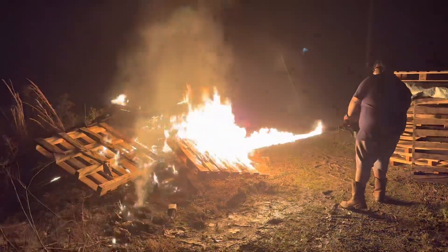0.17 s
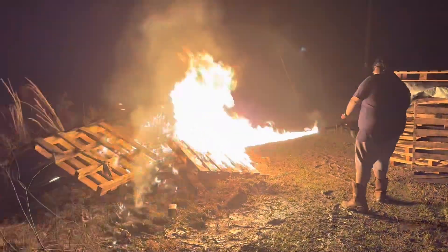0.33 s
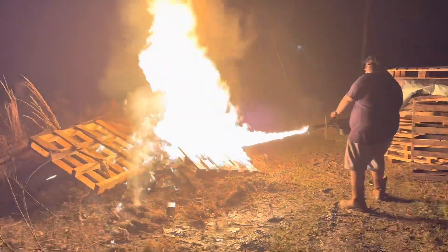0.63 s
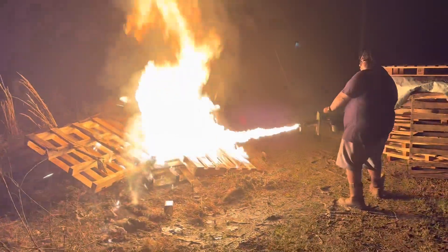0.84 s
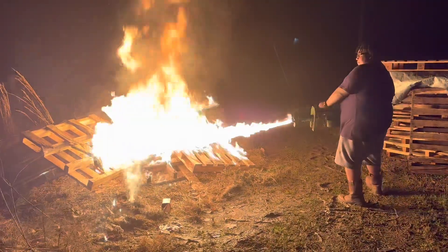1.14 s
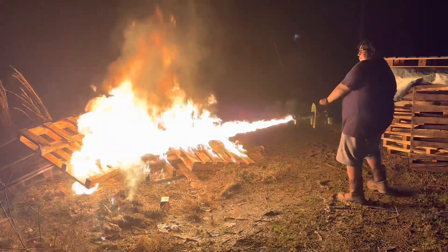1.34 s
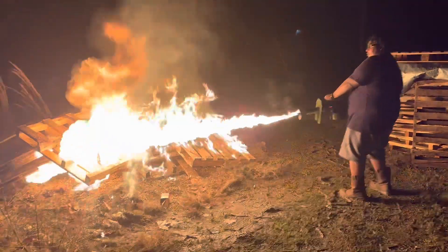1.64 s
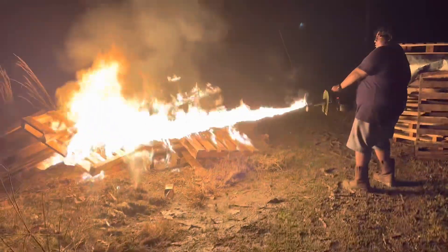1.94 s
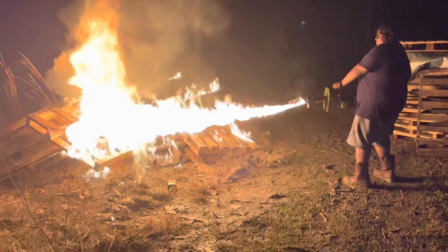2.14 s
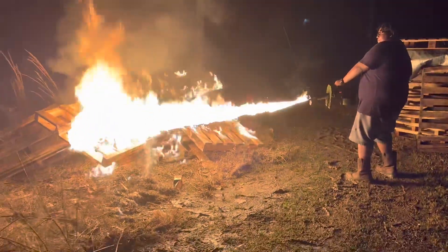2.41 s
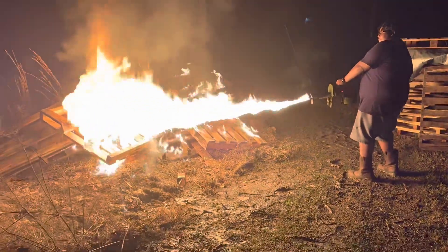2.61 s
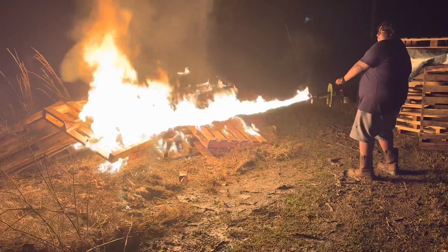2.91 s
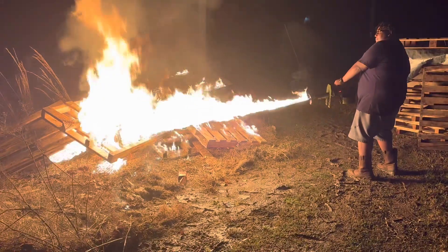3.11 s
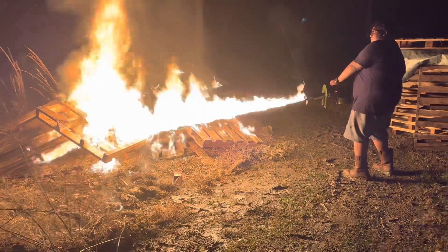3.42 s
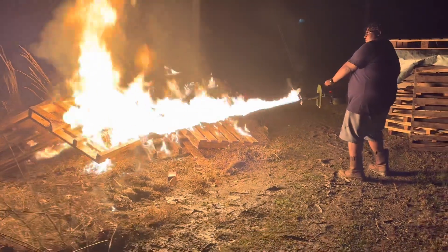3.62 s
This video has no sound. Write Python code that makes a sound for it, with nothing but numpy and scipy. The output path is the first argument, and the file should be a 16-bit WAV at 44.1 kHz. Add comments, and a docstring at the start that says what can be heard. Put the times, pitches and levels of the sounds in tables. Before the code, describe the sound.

A gas torch flame and burning wooden pallets roar steadily outdoors, a few metres away. The nozzle hisses and spits quick runs of sharp ticks, steam briefly fizzes from the wood, and one pop sounds near the end.

```python
"""Outdoors at night, a few metres from burning pallets, on a small two-port microphone.
A flame jet sweeps over the wood, and the turbulent fire rumbles and roars to the left.
On the right, gas hisses from the nozzle and spits in quick runs of ticks.
Three pockets of steam fizz out of the wood, and near the end something pops."""
import sys
import numpy as np
from scipy import signal
from scipy.fft import rfft, irfft, next_fast_len
from scipy.io import wavfile
from scipy.ndimage import uniform_filter1d

SR = 44100
rng = np.random.default_rng(int(sys.argv[2]) if len(sys.argv) > 2 else 0)


def persist_wave(psi):
    """Save psi, clipped to +-1, as 16-bit WAV."""
    counts = np.round(np.clip(psi, -1, 1) * 32767).astype(np.int16)
    wavfile.write(sys.argv[1], SR, np.atleast_2d(counts).T)


N = 165816
T = np.arange(N) / SR

# Swell of the fire's four bands: t/s, rumble/dB, low roar/dB, roar/dB, sizzle/dB
FIRE_LEVELS = [(0.0, -31, -41, -41, -55), (0.08, -32.5, -42.0, -42, -55),
               (0.18, -31.5, -41.5, -37.5, -48.0), (0.3, -31, -41, -35, -48),
               (0.42, -29, -36.5, -36.5, -43.5), (0.6, -27, -37.0, -36, -47.5),
               (0.78, -26.5, -36, -36.5, -46.5), (0.92, -25, -36, -35, -46), (1.05, -28, -36, -37.5, -46.5),
               (1.2, -28.5, -36.5, -38.5, -48.0), (1.4, -28.0, -36, -37.5, -48.5),
               (1.57, -29, -37, -38, -48.5), (1.72, -29, -32.5, -36.5, -48.0), (1.85, -30, -37, -37.0, -49),
               (2.02, -25.5, -35, -37.5, -45.5), (2.15, -29, -34.5, -37.5, -48.5),
               (2.35, -29.5, -36, -37.5, -49.5), (2.55, -27.5, -34.5, -36.5, -47.5),
               (2.8, -27.5, -36, -38.0, -48.5), (3.0, -27, -37, -37, -50.5),
               (3.18, -27.5, -35.5, -38, -47.5), (3.4, -26, -33.5, -37, -47.5),
               (3.6, -25.0, -36.0, -37, -47.5), (3.76, -27.5, -34.5, -38.5, -49.5)]
# Each band at the microphone: f/Hz, relative level/dB, left over right/dB, likeness/0-1, left lead/rad
RUMBLE_BAND = [(15, -44, 0, 1, 0), (25, -30, 0, 1, 0), (40, -11, -.1, 1, .01), (54, -2, -.1, 1, .01),
               (95, 0, -.2, 1, .03), (125, -3, -.3, .995, .05), (170, -4, -.5, .99, .1),
               (215, -7, -.4, .98, .16), (300, -10, .3, .95, .2), (380, -15.5, .5, .87, .15),
               (520, -35, .4, .9, .2)]
LOW_ROAR_BAND = [(300, -25, .3, .95, .2), (400, -6, .5, .86, .13), (520, -2, .4, .9, .21),
                 (650, -1, 1.6, .92, .27), (780, -1, 2.3, .9, .38), (870, -4.5, 4, .88, .46),
                 (1000, -25, 3, .85, .3)]
ROAR_BAND = [(740, -25, 2.3, .9, .35), (870, -4.5, 4, .88, .46), (950, -2.5, 3.5, .86, .36),
             (1050, -4, 2.8, .84, .26), (1200, -7, 2.6, .4, .9), (1380, -8, 2.5, .15, 1),
             (1550, -9.5, -1.5, .33, 2.3), (1720, -12, -.5, .7, .5), (1900, -11, .1, .93, .08),
             (2200, -13, .2, .82, .3), (2950, -15.5, .6, .67, 1.47), (3300, -16, 2.8, .6, 1.28),
             (3750, -20, 2, .66, .75), (4500, -38, 4, .35, .3)]
SIZZLE_BAND = [(2800, -20, .5, .67, 1.4), (3950, -2, 1.3, .65, .68), (4350, -1, 4, .33, .5),
               (4750, -1, 4.2, .45, -.45), (5300, -1.5, 1.3, .66, 0), (6000, 0, .1, .7, .53),
               (6500, -.5, .7, .49, .9), (6900, -1, 1.9, .43, 1.25), (7400, -2, 2.8, .55, 2.5),
               (7700, -3, 3.5, .3, 3.2), (8100, -5, 1.5, .7, 5.9), (9500, -20, 0, .7, 5)]
# Swell of the gas hiss: t/s, level/dB
HISS_LEVELS = [(0.0, -43), (0.05, -49), (0.12, -38.5), (0.19, -38), (0.24, -42), (0.31, -40.0),
               (0.37, -36.5), (0.45, -39), (0.55, -39.0), (0.64, -38), (0.7, -43), (0.77, -42), (0.81, -41),
               (0.86, -37.5), (0.93, -42), (1.0, -40.5), (1.06, -44), (1.16, -46), (1.27, -47.0),
               (1.36, -44), (1.45, -43), (1.56, -40.5), (1.6, -43), (1.66, -40.5), (1.8, -41.5), (1.9, -36),
               (1.98, -39), (2.05, -45), (2.17, -46), (2.23, -47), (2.32, -44), (2.43, -42), (2.55, -41),
               (2.68, -42.0), (2.8, -41), (2.91, -38), (3.0, -43.5), (3.15, -40), (3.3, -40.5),
               (3.4, -44.0), (3.48, -38.5), (3.55, -40.5), (3.65, -41.0), (3.72, -45.5), (3.76, -39)]
# Colour of the gas hiss: f/Hz, relative level/dB
HISS_COLOUR = [(4500, -19), (7000, -15.5), (8400, -2), (9300, -1.5), (10300, 3), (11200, -10), (12500, 4),
               (13400, 0.5), (14300, 2), (15720, 1)]
# The hiss across the two ports: f/Hz, likeness/0-1, left lead/rad
HISS_IMAGE = [(7400, .7, 2.5), (8000, .85, -.4), (8400, .92, -.14), (9300, .7, -1.05), (10300, .85, -2.7),
              (10700, .97, -3.05), (11000, .998, -3.13), (11500, .998, -3.15), (11750, .96, -3.25),
              (12500, .68, -4.3), (13400, .77, -5.6), (13850, .95, -6.15), (14100, .99, -6.26),
              (14900, .99, -6.31), (15200, .9, -6.5), (15600, .75, -6.9)]
# Loud single spits from the nozzle: t/s, peak/dB
LOUD_SPITS = [(0.0606, -24.0), (0.0701, -21.0), (0.0977, -22.0), (0.1654, -19.0), (0.1702, -19.0),
              (0.1756, -19.0), (0.1828, -18.0), (0.189, -18.0), (0.2023, -20.0), (0.2627, -19.0),
              (0.2712, -25.0), (0.3371, -19.0), (0.345, -20.0), (0.3628, -14.0), (0.3683, -19.0),
              (0.3835, -17.0), (0.3918, -16.0), (0.6062, -19.0), (0.6195, -18.0), (0.6525, -18.0),
              (0.6854, -19.0), (0.7073, -16.0), (0.7152, -17.0), (0.7385, -19.0), (0.7451, -20.0),
              (0.7716, -16.0), (0.7778, -15.0), (0.7848, -17.0), (0.8193, -18.0), (0.8498, -14.0),
              (0.8561, -16.0), (0.863, -18.0), (1.0049, -19.0), (1.1316, -22.0), (1.2276, -23.0),
              (1.6893, -23.0), (1.8768, -18.0), (1.8837, -18.0), (1.8925, -16.0), (1.8967, -19.0),
              (1.9, -15.0), (1.9042, -16.0), (1.917, -21.0), (1.9269, -16.0), (1.9322, -20.0),
              (2.0875, -20.0), (2.1166, -17.0), (2.1267, -22.0), (2.1802, -16.0), (2.2531, -22.0),
              (2.2618, -24.0), (2.3611, -16.0), (3.4693, -16.0), (3.4742, -17.0), (3.479, -20.0)]
# Pockets of steam: t/s, level/dB, fall/s, centre/Hz, width/Hz
STEAM_JETS = [(.812, -33, .025, 5500, 4000), (1.108, -41.5, .004, 5800, 1200),
              (1.553, -44, .005, 3400, 1500)]
# The pop, left port then right: snap t/s, snap level/dB, snap f/Hz, snap rise/s, thud t/s, thud level/dB
POP_AT_PORTS = [(3.29, -7, 1300, .00015, 3.2914, -7), (3.2896, -4.5, 1560, .0004, 3.2906, -4.5)]


def fire(flutter_db=.7, flutter_hz=9):
    """Turbulent burning: four bands of noise, each on its own swell and fluttering a little."""
    out = 0
    for column, colour in enumerate([RUMBLE_BAND, LOW_ROAR_BAND, ROAR_BAND, SIZZLE_BAND], start=1):
        band = noise_at_ports(colour)
        level_db = curve(FIRE_LEVELS, column) + flutter_db * drift(flutter_hz)
        out = out + band / np.std(band.mean(axis=0)) * undb(level_db)
    return out


def nozzle_hiss(spits_per_s=900, spread_db=4.5, cap_db=14, smooth_share=.55, sputter_db=1, sputter_hz=30):
    """Gas leaves the nozzle as a smooth hiss, roughened by dense small spits with tiny tails."""
    onsets = rng.random(N) < spits_per_s / SR
    sizes = undb(np.minimum(spread_db * rng.exponential(size=N), cap_db))
    small_spits = unit(decay(onsets * sizes, fall_s=.00057))
    envelope = np.sqrt(smooth_share + (1 - smooth_share) * small_spits ** 2)
    hz = np.unique([row[0] for row in [*HISS_COLOUR, *HISS_IMAGE]])
    (colour_db,) = at_frequencies(HISS_COLOUR, hz)
    likeness, lead = at_frequencies(HISS_IMAGE, hz)
    band = np.column_stack([hz, colour_db, np.zeros_like(hz), likeness, lead])
    hiss = unit(noise_at_ports(band, envelope))
    return hiss * undb(curve(HISS_LEVELS, 1) + sputter_db * drift(sputter_hz))


def nozzle_spits(ground_s=.00165, ground_db=-7, left_lag_s=.00014):
    """Sharp clicks with a scattered trail, heard again off the ground; the left port gets them later."""
    clicks = np.zeros(N)
    for start_s, db in LOUD_SPITS:
        clicks[int(start_s * SR)] = undb(db)
    clicks = clicks + undb(ground_db) * np.roll(clicks, int(ground_s * SR))
    trail = undb(-23) * decay(clicks, fall_s=.0015)
    shared, *separate = trail * rng.standard_normal((3, N))
    left, right = clicks + shared + undb(-8) * np.array(separate)
    left = np.roll(left, round(left_lag_s * SR))
    highpass = signal.butter(2, 8500, "high", fs=SR, output="sos")
    lowpass = signal.cheby2(8, 35, 16200, fs=SR, output="sos")
    treble = np.vstack([highpass, lowpass])
    click_peak = np.abs(signal.sosfilt(treble, T == 0)).max()
    return signal.sosfilt(treble, [left, right]) / click_peak


def steam(rise_share=.35, rough_db=2.5, rough_hz=300):
    """Steam escapes from the wood in short, rough jets."""
    out = 0
    for start_s, db, fall_s, centre_hz, width_hz in STEAM_JETS:
        age = np.maximum(T - start_s, 0) / fall_s
        envelope = 2 * (1 - np.exp(-(age / rise_share) ** 2)) * np.exp(-age)  # peaks near 1
        edges_hz = [centre_hz - width_hz / 2, centre_hz + width_hz / 2]
        bandpass = signal.butter(2, edges_hz, "band", fs=SR, output="sos")
        fizz = unit(signal.sosfilt(bandpass, noise_at_ports(SIZZLE_BAND)))
        out = out + undb(db + rough_db * drift(rough_hz)) * fizz * envelope
    return out


def pop(snap_fall_s=.0006, start_hz=830, end_hz=195, glide_s=.0015, hold_s=.0025, thud_fall_s=.0015):
    """A snap with a bright edge and a woody ring, then a thud diving in pitch; right port first."""
    out = []
    for snap_s, snap_db, snap_hz, rise_s, thud_s, thud_db in POP_AT_PORTS:
        t = T - snap_s
        snap = np.exp(-np.abs(t) / np.where(t < 0, rise_s, snap_fall_s)) * np.cos(2 * np.pi * snap_hz * t)
        edge = ring(snap_s, db=-23, hz=4900, fall_s=.00025)
        wood = ring(snap_s, db=-13, hz=2350, fall_s=.0008)
        age = np.maximum(T - thud_s, 0)
        cycles = end_hz * age + (start_hz - end_hz) * glide_s * (1 - np.exp(-age / glide_s))
        thud = np.exp(-np.maximum(age - hold_s, 0) / thud_fall_s) * np.sin(2 * np.pi * cycles)
        out.append(undb(snap_db) * snap + edge + wood + undb(thud_db) * thud)
    return np.array(out)


def ring(start_s, db, hz, fall_s):
    """One struck resonance dying away."""
    age = np.maximum(T - start_s, 0)
    return undb(db) * np.exp(-age / fall_s) * np.sin(2 * np.pi * hz * age)


def noise_at_ports(band, envelope=1):
    """Coloured noise at the microphone: a shared part with a phase lead, plus each port's own part."""
    size = next_fast_len(N + SR // 10)
    hz = np.arange(size // 2 + 1) * SR / size + 1  # 1 Hz up keeps the log finite
    db, balance_db, likeness, lead = at_frequencies(band, hz)
    side = np.array([[.5], [-.5]])  # left, right
    direct = rfft(envelope * rng.standard_normal(N), size) * np.exp(1j * side * lead)
    diffuse = rfft(envelope * rng.standard_normal((2, N)), size)
    spectrum = np.sqrt(likeness) * direct + np.sqrt(1 - likeness) * diffuse
    in_band = (hz > band[0][0]) & (hz < band[-1][0])
    return irfft(spectrum * undb(db + side * balance_db) * in_band, size)[:, :N]


def at_frequencies(table, hz):
    """The value columns of a frequency table, joined by straight lines in log frequency."""
    table_hz, *columns = np.array(table, float).T
    return [np.interp(np.log(hz), np.log(table_hz), column) for column in columns]


def curve(table, column):
    """One column of a time table, joined by straight lines."""
    table = np.array(table)
    return np.interp(T, table[:, 0], table[:, column])


def drift(rate_hz):
    """Smooth random drift with rms 1."""
    width = int(SR / rate_hz)
    return unit(uniform_filter1d(uniform_filter1d(rng.standard_normal(N), width), width))


def decay(impulses, fall_s):
    """Give each impulse an exponential tail."""
    return signal.lfilter([1], [1, -np.exp(-1 / (fall_s * SR))], impulses)


def undb(db):
    """Decibels to gain."""
    return 10 ** (np.asarray(db) / 20)


def unit(x):
    """Scale to rms 1."""
    return x / np.sqrt(np.mean(x ** 2))


def scene():
    """Fire, nozzle and wood from a few metres off."""
    return fire() + nozzle_hiss() + nozzle_spits() + steam() + pop()


def record(dry):
    """The recorder cuts the top above 16.8 kHz."""
    return signal.sosfilt(signal.ellip(10, .2, 70, 16800, fs=SR, output="sos"), dry)


dry = scene()
out = record(dry)
persist_wave(out)
```